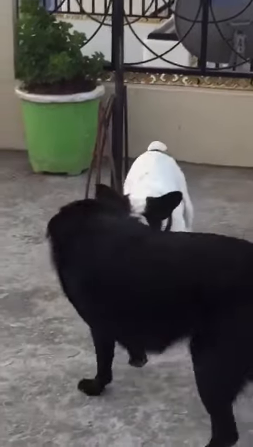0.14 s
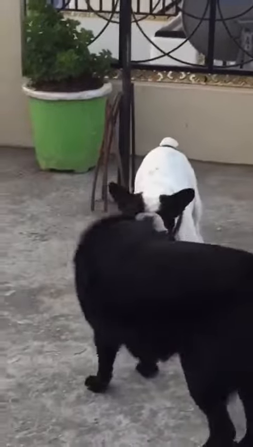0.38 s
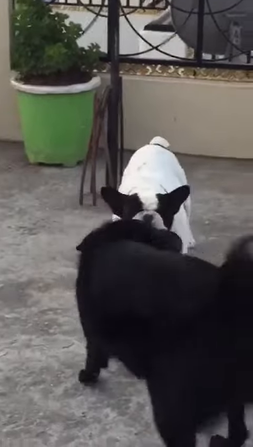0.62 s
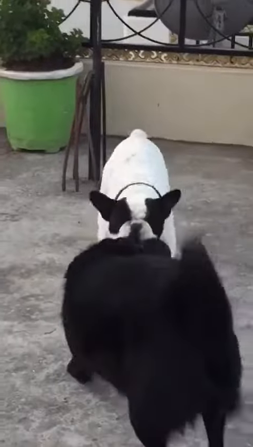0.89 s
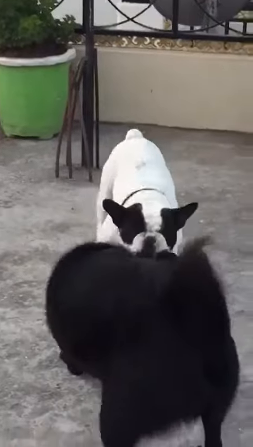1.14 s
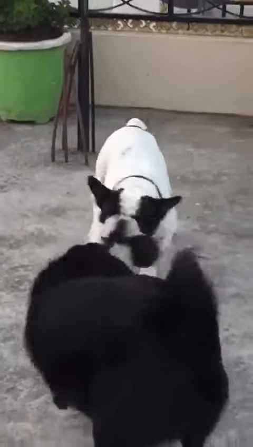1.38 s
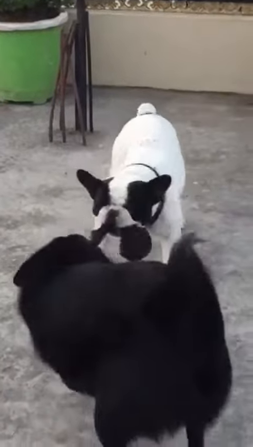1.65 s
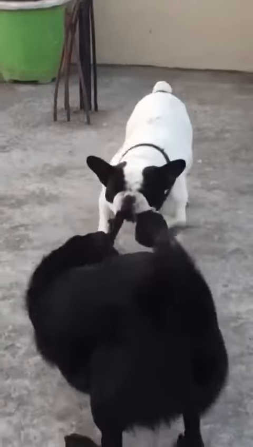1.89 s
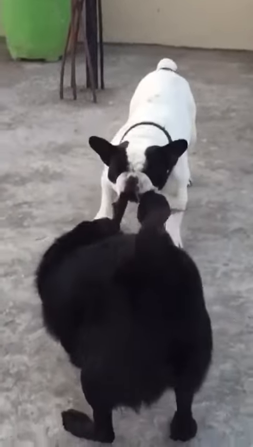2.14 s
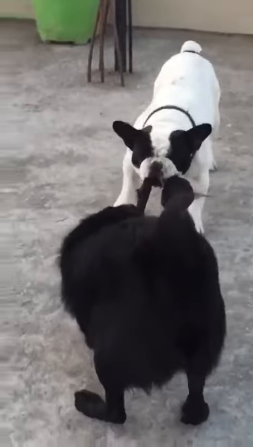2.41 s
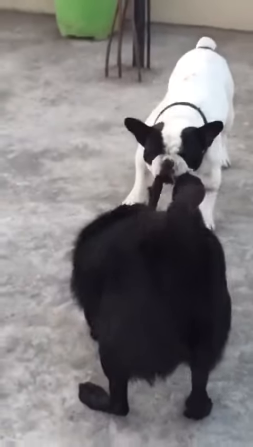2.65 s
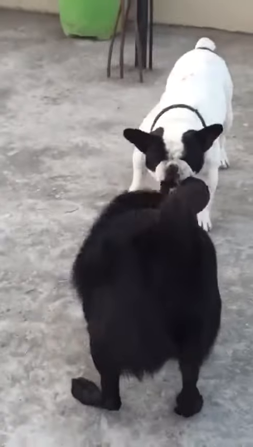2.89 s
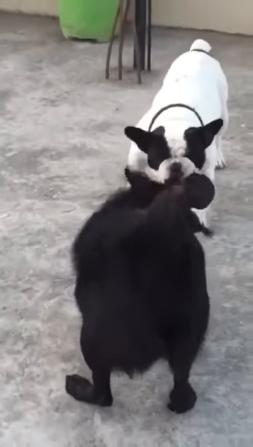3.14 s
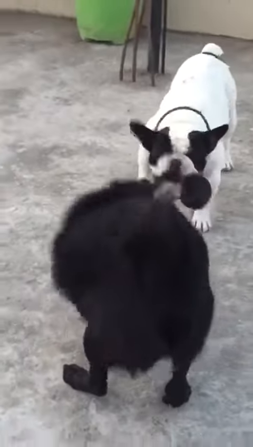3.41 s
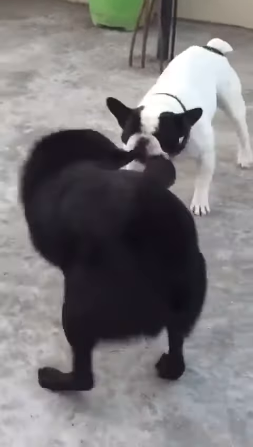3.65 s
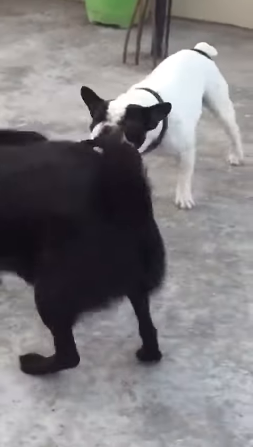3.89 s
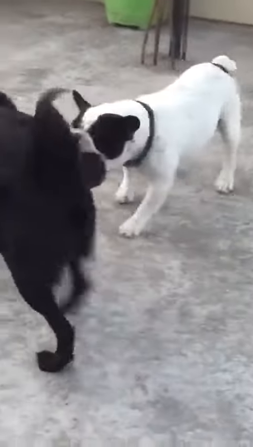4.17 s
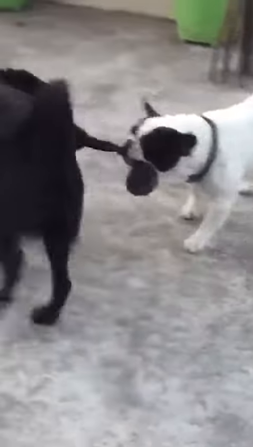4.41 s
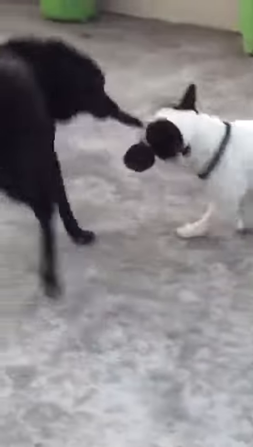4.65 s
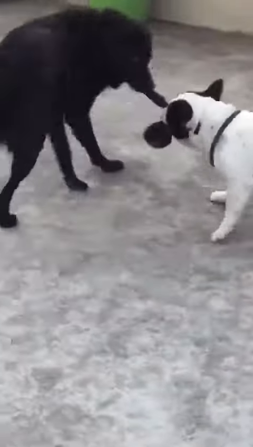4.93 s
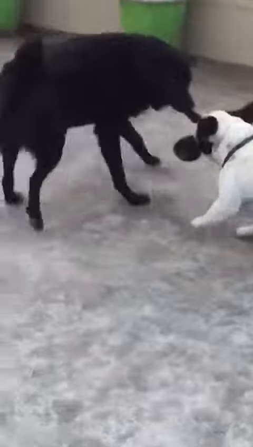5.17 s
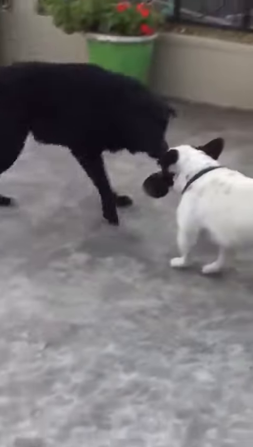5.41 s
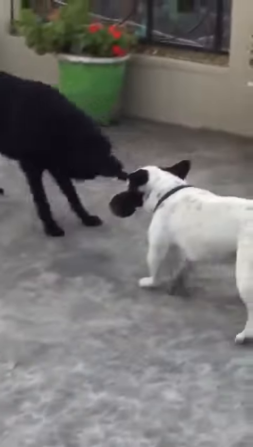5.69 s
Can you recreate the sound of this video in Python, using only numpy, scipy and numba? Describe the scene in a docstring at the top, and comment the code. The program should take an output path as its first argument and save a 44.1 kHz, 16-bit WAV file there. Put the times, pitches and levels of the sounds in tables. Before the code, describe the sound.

Low, buzzing growls from one dog alternate with breathy, rougher snarls from another, their mouths full of a toy. Paws scrape and claws tick on gritty concrete, most clearly past the middle. Barks burst out abruptly, followed by snorting and hissing nasal breath, a short pause, then a snort and more snarling. Close outdoor pickup, short soft reflections from low walls, a quiet distant bass hum behind.

```python
"""Two dogs growl over a rubber toy on a concrete terrace, close to one microphone. Uneven pulses of the vocal
folds ring chest, throat, mouth and snout: one dog growls low and fairly evenly with its mouth on the toy, the
other snarls raggedly, bursts into barks and draws in a snort. Filtered noise makes its pants, nasal rattle and
hiss and the scuffing paws; short decaying tones make claw taps and padded thuds. Low walls answer with fading
noise, and the far town is a steady low hum of noise."""
import sys
import numpy as np
from scipy import signal
from scipy.fft import rfft, irfft, next_fast_len
from scipy.io import wavfile
from scipy.ndimage import map_coordinates
from numba import njit

SR = 44100
rng = np.random.default_rng(int(sys.argv[2]) if len(sys.argv) > 2 else 0)


def ratio(d):
    """dB to gain"""
    e = np.asarray(d, float) / 20
    return 10 ** e


def int16_out(signal):
    """Quantize to a 16-bit WAV file."""
    q = np.round(np.clip(np.atleast_2d(signal).T, -1, 1) * 32767)
    wavfile.write(sys.argv[1], SR, q.astype(np.int16))


N = 255780  # samples


# steady growls of the dog with the toy: (time [s], pitch [Hz], effort [dB], jaw opening [0-1])
GROWLS = [
    [(0.27, 98.05, -49, 1.0), (0.3, 101.1, -40, 0.63), (0.38, 96.7, -34.5, 0.53), (0.474, 91.2, -34, 0.57),
     (0.57, 89.8, -42.5, 0.54), (0.66, 87.8, -41, 0.42), (0.72, 78.4, -54.5, 0.54)],
    [(1.8, 92.5, -36.5, 0.3), (1.83, 89.2, -32.5, 0.02), (1.89, 83.2, -36.5, 0.57),
     (1.972, 88.55, -36, 0.18), (2.05, 76.5, -39.5, 0.15), (2.176, 76.2, -43, 0.07), (2.29, 70.4, -53, 0)],
    [(2.545, 87.9, -36.5, 0.05), (2.6, 103.5, -31, 0.3), (2.66, 106.1, -34, 0.05), (2.82, 108.9, -35, 0.26),
     (2.945, 110.2, -34, 0.03), (2.99, 120.8, -34, 0.1), (3.07, 119.3, -36, 0.08),
     (3.15, 102.2, -32.5, 0.01), (3.26, 106.3, -35.5, 0.28), (3.35, 92.2, -34.5, 0.14),
     (3.415, 83.2, -43, 0.41), (3.44, 87.9, -56, 0), (3.49, 83.6, -65, 0)],
]
# its throat, mouth and snout: (level over the effort with jaws shut [dB], change on opening them [dB])
GROWL_JAWS = [(-3, -7), (-31, 36.5), (-38.5, 24.5)]
# roughness of the growl: (time [s], factor [1])
RASP = [(.35, .5), (.41, 1.4), (.53, 1.2), (.6, .5), (1.9, .5), (2.3, .6), (2.6, 1.1), (3.08, 1.1),
        (3.15, .4)]
# mouth, snout and chest around the toy, each a list of resonances: (centre [Hz], width [Hz], level [dB])
SHUT_TRACT = ([(980, 200, -5), (1242, 240, 3), (1720, 300, 1.5)], [(2220, 260, 5), (3270, 660, -10)],
               [(92.5, 290, -4.5), (219, 105, 3.5)])
# time constant with which the throat joins in, one for each growl: [s]
THROAT_OPENS_S = [0.039, 0.17, 0.014]
GROWL_THROAT_HZ = [680, 660, 660]  # one for each growl
HUM_DB, RATTLE_DB = 0, -9  # clear and rough shares of the growling chest
GRIP_DB = 3  # unevenness of mouth and snout


def growler():
    """Fairly regular pulses through a mouth on the toy, over a clear chest hum; the rasp comes and goes."""
    rasp = curves(RASP)[0]
    call = sounding(GROWLS).argmax(0)
    pitch, gains = jawed(GROWLS, GROWL_JAWS)
    starts = np.array([c[0][0] for c in GROWLS])
    since = np.clip(np.arange(N) / SR - starts[call], 0, None)
    opened = 1 - np.exp(-since / np.array(THROAT_OPENS_S)[call])
    # the grip on the toy shifts and lets the mouth and snout sound unevenly
    gains = gains * [np.ones(N), opened, ratio(GRIP_DB * wobble(30)), ratio(GRIP_DB * wobble(20))]
    throat_hz = np.array(GROWL_THROAT_HZ)[call] * (1 + 0.02 * wobble(7))
    clear = ratio(HUM_DB) * gains[0] * hum(pitch, rasp)
    gains[0] *= ratio(RATTLE_DB)
    rough = voice(pitch, gains, throat_hz, SHUT_TRACT, jitter=0.03 * rasp, scatter_db=3 * rasp,
                  breath=0.16 * rasp, throb=0.3 * rasp, throat_width_hz=110.0)
    return clear + rough


# partials of the growling chest, the halves from alternate strong and weak closures:
# (multiple of the pitch [1], level [dB])
HUM_PARTIALS = [(1, 0), (1.5, -12), (2, -1), (2.5, -10), (3, -13)]


def hum(pitch, rasp):
    """The lowest partials of the steady growl, clear lines that waver with the rasp."""
    phase = 2 * np.pi * np.cumsum(pitch * (1 + 0.035 * rasp * wobble(70))) / SR
    total = np.zeros(N)
    for multiple, db in HUM_PARTIALS:
        level = ratio(db + 2.5 * rasp * wobble(45))
        roughened = rasp ** 2 if multiple % 1 else 1  # the halves grow with the rasp
        total += level * roughened * np.sin(multiple * phase)
    return unit(total)


# the ragged snarl under the barks of the other dog: (time [s], effort [dB], jaw opening [0-1])
SNARLS = [
    [(0.85, -44, 0), (0.94, -36, 0.47), (1.06, -37.5, 0.5), (1.2, -41, 0.46), (1.31, -34, 0.5),
     (1.53, -33, 0.35), (1.6, -37.5, 0.4), (1.7, -37.5, 0.33), (1.79, -42.5, 0.7)],
    [(3.525, -27, 0.3), (3.6, -45.5, 0.3), (3.78, -41.5, 0), (3.92, -39.5, 0.34), (4.04, -31, 0.3),
     (4.15, -35, 0.69), (4.29, -42, 0), (4.45, -41, 0.97), (4.57, -34.5, 0.7), (4.68, -36, 0),
     (4.8, -42, 0.98), (4.88, -56.5, 1), (5.2, -59.5, 0.85), (5.28, -66.5, 1)],
    [(5.64, -44.5, 0.7), (5.68, -42, 0.12), (5.8, -37, 0.2)],
]
# its throat, mouth and snout: (level over the effort with jaws shut [dB], change on opening them [dB])
SNARL_JAWS = [(-16.5, 13), (-25, 17), (-57.5, 46.2)]
# its mouth, snout and chest, each a list of resonances: (centre [Hz], width [Hz], level [dB])
OPEN_TRACT = ([(1051, 480, 8.7), (1238, 430, 9.5), (1597, 340, 3.8)], [(2200, 305, 20.5), (3540, 230, -1),
               (3940, 400, -9)], [(96.7, 18.7, 4.5), (252, 410, -2.5)])
SNARL_HZ, SNARL_HZ_PER_DB = 108.76, 0.25  # pitch at -38 dB, and its rise with effort
SNARL_THROAT_HZ, BARK_SNOUT_DB = 614, -19  # snout relative to the barking mouth


def snarler():
    """Chaotic pulses drowned in breath over a throbbing chest; barks drive throat, mouth and snout harder."""
    effort_db, jaw = curves(np.concatenate(SNARLS))
    pitch = SNARL_HZ + SNARL_HZ_PER_DB * (effort_db + 38)
    chest = sounding(SNARLS).max(0) * ratio(effort_db)
    bed = [chest * ratio(shut_db + opens_db * jaw) for shut_db, opens_db in SNARL_JAWS]
    throat, mouth, bark_hz = barks()
    # the louder of snarl and bark pulls the throat towards its own resonance
    pull = (throat * bark_hz).sum(0) + (bed[0] + 1e-9) * SNARL_THROAT_HZ
    throat_hz = pull / (throat.sum(0) + bed[0] + 1e-9)
    gains = [chest, bed[0] + throat.sum(0), bed[1] + mouth, bed[2] + ratio(BARK_SNOUT_DB) * mouth]
    return voice(pitch, gains, throat_hz, OPEN_TRACT, jitter=0.12, scatter_db=2.5,
                 breath=0.75, throb=0.55, throat_width_hz=190.0)


# barks: (start time [s], throat level [dB], rise [s], throat resonance at the start [Hz],
# mouth over throat [dB])
BARKS = [(0.849, -48, 0.0025, 980, -23), (0.902, -42, 0.022, 562, 2.5), (1.39, -30, 0.051, 573, -1),
         (3.521, -24.5, 0.041, 549.4, 2), (3.759, -46.5, 0.011, 930, 1), (3.959, -38.5, 0.09, 490, -5.5),
         (4.52, -21.5, 0.094, 598, -6.5), (5.68, -45.5, 0.025, 680, -35), (5.75, -39.5, 0.033, 660, -6.5)]
GLIDE_HZ_PER_S = 990
FALL_DB_PER_S, ROUND_S = 178.5, 0.017  # decay after a rounded top
JAWS_CLOSE = 1.75  # the mouth fades this much faster in dB


def barks():
    """Each bark swells and falls; the jaws close before the throat is spent, and its resonance climbs."""
    start, peak_db, rise, hz, mouth_db = np.transpose(BARKS)[..., None]
    t = np.arange(N) / SR - start
    swell = ratio(peak_db) * np.clip(t / rise, 0, 1) ** 0.79
    spent_db = FALL_DB_PER_S * (np.hypot(np.clip(t - rise, 0, None), ROUND_S) - ROUND_S)
    throat = swell * ratio(-spent_db)
    mouth = (swell * ratio(mouth_db - JAWS_CLOSE * spent_db)).sum(0)
    return throat, mouth, hz + GLIDE_HZ_PER_S * np.clip(t, 0, 0.3)


# snorts: (time [s], pitch [Hz], effort [dB], jaw opening [0-1])
SNORTS = [
    [(4.365, 126, -44, 0.11), (4.385, 135, -36, .05), (4.45, 166, -36, 0.041), (4.54, 170.7, -33, 0.033)],
    [(4.56, 245.7, -32, 0), (4.625, 260, -32, 0)],
    [(5.315, 112.2, -69.5, 1), (5.345, 113.7, -59, 1), (5.36, 120.9, -35.5, 0.58), (5.41, 150, -35.5, 0.57),
     (5.5, 146.1, -38.5, 0.84), (5.55, 125.3, -34.5, 0.6), (5.62, 116.1, -38.5, 0.43)],
]
# throat, mouth and snout: (level over the effort with jaws shut [dB], change on opening them [dB])
SNORT_JAWS = [(-15.5, 5.2), (-21, 24.6), (-32.5, 25)]
# mouth and chest on the drawn breath, each a list of resonances: (centre [Hz], width [Hz], level [dB])
DRAWN_TRACT = ([(1257, 320, 5), (1520, 300, -5), (1785, 145, 1)], [(135, 140, -9), (247, 220, -16)])
# the snout narrows during the last snort:
# (centre before [Hz], centre after [Hz], width [Hz], level before [dB], level after [dB])
SNOUT = [(2235, 2328, 155, 1.5, -4), (2910, 3100, 250, -6.5, -1), (3560, 3500, 370, -10.5, -8),
         (4040, 4100, 300, -5.5, -6), (5380, 5960, 500, -12, -16), (6800, 7100, 440, -15, -23),
         (9050, 8500, 2200, -16.5, -24)]
# start and end of the narrowing: [s]
NARROWS_S = [5.44, 5.67]
SNORT_THROAT_HZ = 659


def snorts():
    """Breath drawn in sets the folds going and rings the long snout, whose resonances move as it narrows."""
    narrowed = np.interp(np.arange(N) / SR, NARROWS_S, [0, 1])
    snout = []
    for hz, hz_after, width, db, db_after in SNOUT:
        snout.append((hz + (hz_after - hz) * narrowed, width, db + (db_after - db) * narrowed))
    tract = DRAWN_TRACT[0], snout, DRAWN_TRACT[1]
    pitch, gains = jawed(SNORTS, SNORT_JAWS)
    return voice(pitch, gains, np.full(N, float(SNORT_THROAT_HZ)), tract, jitter=0.02, scatter_db=2,
                 breath=0.14, throb=0.15, throat_width_hz=150.0)


# resonance of the windpipe: (centre [Hz], width [Hz], level [dB])
WINDPIPE = [(406, 148, 0)]
TREMOR_DB, TREMOR_HZ = -14, 56  # the straining body shudders below the voice
SINUS_HZ = 1903  # a side cavity of the nose swallows this pitch


def voice(pitch, gains, throat_hz, tract, jitter, scatter_db, breath, throb, throat_width_hz):
    """The folds ring chest, throat, mouth and snout; breath takes a larger share in the higher resonances."""
    pulses, puffs = folds(pitch, jitter, scatter_db)

    def drive(share):
        return np.sqrt(1 - share) * pulses + np.sqrt(share) * puffs

    chest = resonant(resonant(drive(breath ** 1.5), tract[2]), [(132, 1500, 0)])
    # the ribs pass the lowest partials
    chest = filtered(chest, lambda hz: 1 / (1 + 1j * hz / 275 - (hz / 275) ** 2) ** 2)
    windpipe = resonant(resonant(puffs, WINDPIPE), WINDPIPE)
    chest = unit(chest) + ratio(-12) * unit(windpipe)
    # loose tissue flutters
    chest = chest * (1 + throb * np.sin(2 * np.pi * np.cumsum(25 + 7 * wobble(12)) / SR))
    shudder = [(TREMOR_HZ, 50, 0)]
    chest = chest + ratio(TREMOR_DB) * unit(resonant(resonant(puffs, shudder), shudder))

    throat = sweeping(drive(breath), throat_hz, throat_width_hz, SR)
    throat = sweeping(throat, throat_hz, 266.0, SR)
    mouth = resonant(shifting(drive(breath ** 0.2), tract[0]), [(1520, 3100, 0)])
    snout = resonant(shifting(drive(breath ** 0.044), tract[1]), [(3240, 2500, 0)])
    sound = gains[0] * unit(chest) + gains[1] * unit(throat)
    sound = sound - gains[2] * unit(mouth) + gains[3] * unit(snout)
    return sound - 0.47 * resonant(sound, [(SINUS_HZ, 250, 0)])


def folds(pitch, jitter, scatter_db):
    """Closures of the vocal folds, uneven in time and size, and the puff of breath after each."""
    phase = np.cumsum(pitch * (1 + jitter * wobble(90))) / SR
    cycle = phase.astype(int)
    size = ratio(scatter_db * rng.uniform(-0.37, 1, N // 100)[cycle])
    pulses = unit(size * (np.diff(cycle, prepend=0) > 0))
    puffs = unit(size * np.exp(-1.2 * (phase - cycle)) * rng.standard_normal(N))
    return pulses, puffs


# wheezing breaths: (start time [s], length [s], mouth level [dB], snout level [dB])
PANTS = [(1.27, 0.12, -50, -67), (4.356, 0.17, -50.5, -52), (4.902, 0.073, -53, -55)]
# mouth and snout, each a list of resonances: (centre [Hz], width [Hz], level [dB])
WHEEZE = ([(1320, 450, 3.5), (1790, 190, 0)], [(2300, 200, 7.5), (2540, 180, -3), (4440, 260, -9.5)])


def pants():
    """Breath wheezes past the toy in uneven gusts: noise through resonances of mouth and snout."""
    air = ratio(3 * wobble(60)) * rng.standard_normal(N)
    mouth, snout = (unit(shifting(air, modes)) for modes in WHEEZE)
    out = np.zeros(N)
    for start, length, mouth_db, snout_db in PANTS:
        out += held(start, length) * (ratio(mouth_db) * mouth + ratio(snout_db) * snout)
    return out


# rattle in the nostrils: (start time [s], length [s], level [dB])
RATTLES = [(0.886, 0.33, -71), (1.48, 0.36, -66.5), (3.857, 0.426, -70), (4.374, 0.13, -64)]
# resonances of the nostrils: (centre [Hz], width [Hz], level [dB])
NOSTRILS = [(8200, 1500, 4), (6430, 1500, -4.5)]
# air forced out: (peak time [s], half length [s], level past the teeth [dB], level in the nose [dB])
HUFFS = [(1.31, .04, -64, -85), (3.33, 0.12, -69.5, -95), (1.9, 0.056, -65, -56.5),
         (4.605, 0.13, -56.5, -73.5), (4.79, 0.064, -57, -56)]
# resonances at the teeth: (centre [Hz], width [Hz], level [dB])
TEETH = [(3500, 710, 2), (4120, 400, 8), (5660, 1500, -1), (7070, 400, 1)]


def nose():
    """The soft palate flaps about eighty times a second and clicks in the nostrils; hard breaths hiss."""
    flaps, hiss = folds(80 * ratio(2 * wobble(12)), jitter=0.4, scatter_db=10)
    clicks = ratio(2 * wobble(20)) * (flaps + 0.6 * hiss)
    clicks = unit(shifting(clicks, NOSTRILS, drift=0.025, flicker_db=2))
    rattle = sum(ratio(db) * held(start, length) for start, length, db in RATTLES) * clicks

    peak, half, teeth_db, nose_db = np.transpose(HUFFS)[..., None]
    swell = np.exp(-((np.arange(N) / SR - peak) / half) ** 2)
    air = ratio(3.5 * wobble(73)) * rng.standard_normal((2, N))
    teeth = unit(resonant(air[0], TEETH))
    nostrils = unit(resonant(air[1], [(8370, 410, 0)]))
    return rattle + (ratio(teeth_db) * swell).sum(0) * teeth + (ratio(nose_db) * swell).sum(0) * nostrils


# paws dragged over concrete: (start time [s], level of the noise crests [dB], length [s])
SCUFFS = [(0.473, -45, 0.09), (1.076, -41, 0.056), (1.335, -32, 0.052), (3.366, -52, 0.044),
          (3.589, -46, 0.059), (3.658, -46.5, 0.05), (3.758, -34.5, 0.058), (3.977, -38.5, 0.068),
          (5.082, -39, 0.035), (5.115, -39.5, 0.044), (5.747, -32.5, 0.031)]
# spectrum of the grit: (frequency [Hz], level per Hz [dB])
GRIT = [(1470, -36), (2500, -9.5), (3120, -5.5), (3690, -5), (8830, -8.5), (11800, -19)]


def paws():
    """Pads and claws drag over grit: crackling noise that swells and fades."""
    t = np.arange(N) / SR
    stroke = np.zeros(N)
    for start, db, length in SCUFFS:
        u = np.clip(t - start, 0, None) / length
        # the mean level lies well below the crests
        stroke += ratio(db - 14.0) * (1 - np.exp(-u / 0.61)) * np.exp(-u ** 2)
    return stroke * unit(ratio(5.8 * wobble(250)) * coloured(GRIT))


# claw and toy taps: (time [s], level before the soft onset [dB], ring [Hz])
CLAWS = [(3.757, -48, 5520), (3.769, -30.5, 935), (3.783, -41, 5350), (3.802, -28, 940), (3.998, -43, 6600),
         (4.016, -49.5, 8200), (5.103, -46, 5800)]
TAP_T60_S, TAP_RISE_S = 0.026, 0.00065


def claws():
    """Claw tips and the swinging toy tap the concrete and ring for a moment."""
    out = np.zeros(N + SR)
    t = np.arange(SR // 20) / SR
    envelope = ratio(-60 * t / TAP_T60_S) * (1 - np.exp(-t / TAP_RISE_S))
    for start, db, hz in CLAWS:
        out[round(start * SR):][:len(t)] += ratio(db) * envelope * np.sin(2 * np.pi * hz * t)
    return out[:N]


# weight dropped on a padded paw: (time [s], peak level of the envelope [dB])
THUDS = [(0.1, -50), (0.761, -46), (0.805, -47), (4.93, -46)]
THUD_HZ, THUD_S = 105, 0.012  # pitch, and time to the peak


def thuds():
    """A soft low push each time a dog braces a leg."""
    start, db = np.transpose(THUDS)[..., None]
    u = np.clip(np.arange(N) / SR - start, 0, None) / THUD_S
    return (ratio(db) * u * np.exp(1 - u) * np.sin(2 * np.pi * THUD_HZ * THUD_S * u)).sum(0)


# how long the low walls of the terrace answer: (frequency [Hz], time to fall 60 dB [s])
WALLS = [(150, 0.88), (700, 0.23), (3000, 0.016), (8000, 0.048)]
WALL_LOW_HZ = 300  # the low walls return little bass


def walls(x):
    """Each frequency dies at its own speed; the echo is noise, drawn anew for each overlapping half second."""
    out = np.zeros(N + SR)
    step = SR // 4
    for i in range(-step, N, step):
        hz, t, z = signal.stft(rng.standard_normal(SR // 2), SR, nperseg=256)
        fade = ratio(-60 * t / along(WALLS, hz)[:, None])
        tail = signal.istft(z * fade, SR, nperseg=256)[1]
        piece = x[max(i, 0):i + 2 * step] * np.hanning(2 * step)[max(-i, 0):N - i]
        wet = signal.fftconvolve(piece, tail / np.linalg.norm(tail))
        out[max(i, 0) + 300:][:len(wet)] += wet  # 7 ms late, a path of over two metres
    return filtered(out[:N], lambda hz: (1j * hz / (WALL_LOW_HZ + 1j * hz)) ** 2)


# spectrum of the far town: (frequency [Hz], level per Hz [dB])
TOWN = [(15, -35), (30, -7.5), (60, -1), (110, 3.5), (165, -10.5), (260, -10.5), (400, -17), (620, -14),
        (1100, -18), (2000, -24.5), (3500, -30.5), (8000, -38), (11800, -43.5)]
TOWN_DB = -56.5


def town():
    """The far town: steady noise, mostly bass, wavering slightly in level."""
    return ratio(TOWN_DB + 1.5 * wobble(6)) * coloured(TOWN)


ATTACK_S, RELEASE_S = 0.006, 0.02


def held(start, length):
    """Rises at the start, holds, dies away after the end."""
    t = np.arange(N) / SR - start
    return np.clip(t / ATTACK_S, 0, 1) * np.exp(-np.clip(t - length, 0, None) / RELEASE_S)


def sounding(calls):
    """The envelope of each call of a table."""
    return np.array([held(c[0][0], c[-1][0] - c[0][0]) for c in calls])


def jawed(calls, jaws):
    """Pitch, and the gains of chest, throat, mouth and snout as effort and jaw opening set them."""
    pitch, effort_db, jaw = curves(np.concatenate(calls))
    layers_db = [effort_db] + [effort_db + shut_db + opens_db * jaw for shut_db, opens_db in jaws]
    return pitch, sounding(calls).max(0) * ratio(layers_db)


def shifting(x, modes, drift=0.015, flicker_db=2):
    """Steep resonances of soft tissue: each wanders in pitch and strength on its own."""
    out = np.zeros(N)
    for k, (centre, width, db) in enumerate(modes):
        hz = centre * (1 + drift * wobble(9))
        norm = (1 - np.exp(-2 * np.pi * width / SR)) / 2  # brings the peak gain near one
        ringing = sweeping(sweeping(x, hz, float(width), SR), hz, float(width), SR)
        out += (-1) ** k * ratio(db + flicker_db * wobble(16)) * norm ** 2 * ringing
    return out


@njit
def sweeping(x, hz, width_hz, rate):
    """A resonance whose centre moves from sample to sample."""
    y = np.zeros(len(x))
    r = np.exp(-np.pi * width_hz / rate)
    for i in range(2, len(x)):
        turn = 2 * r * np.cos(2 * np.pi * hz[i] / rate)
        y[i] = x[i] - x[i - 2] + turn * y[i - 1] - r * r * y[i - 2]
    return y


def resonant(x, modes):
    """x through parallel resonances of alternating sign."""
    def response(f):
        return sum((-1) ** k * ratio(db) * 1j * f * w / (c * c - f * f + 1j * f * w)
                   for k, (c, w, db) in enumerate(modes))
    return filtered(x, response)


def filtered(x, response):
    """x times a complex response of frequency."""
    m = next_fast_len(N + SR // 2)
    return irfft(rfft(x, m) * response(np.fft.rfftfreq(m, 1 / SR)), m)[..., :N]


def coloured(spectrum):
    """Noise of rms 1 with the given spectrum."""
    return unit(filtered(rng.standard_normal(N), lambda hz: ratio(along(spectrum, hz))))


def wobble(rate):
    """A smooth random curve, rate knots a second."""
    knots = rng.standard_normal(int(N * rate / SR) + 4)
    return map_coordinates(knots, [np.arange(N) * rate / SR])


def curves(rows):
    """One value per sample for each column after the time."""
    s, *cols = np.transpose(rows)
    return [np.interp(np.arange(N) / SR, s, c) for c in cols]


def along(points, hz):
    """(Hz, value) points on a log axis."""
    f, v = np.transpose(points)
    return np.interp(np.log(hz + 1), np.log(f + 1), v)


def unit(x):
    """x scaled to rms 1."""
    return x / np.sqrt(np.mean(x ** 2) + 1e-20)


def scene():
    """The dogs, their echo off the low walls, and the far hum of the town."""
    voices = growler() + snarler() + snorts()
    dogs = voices + pants() + nose() + paws() + claws() + thuds()
    return (dogs + ratio(-7.5) * walls(dogs) + town())[None]


def roll_off(x):
    """The treble ends steeply here."""
    return signal.sosfilt(signal.butter(12, 11990, fs=SR, output="sos"), x)


def record(dry):
    """The microphone rounds off the loudest peaks and drops the deepest bass and the top."""
    rounded = dry / (1 + np.abs(dry / 0.45) ** 4) ** (1 / 4)
    mix = filtered(rounded, lambda hz: (1j * hz / (45 + 1j * hz)) ** 2 * (hz < 11950))
    return roll_off(mix)


dry = scene()
out = record(dry)
int16_out(out)
```